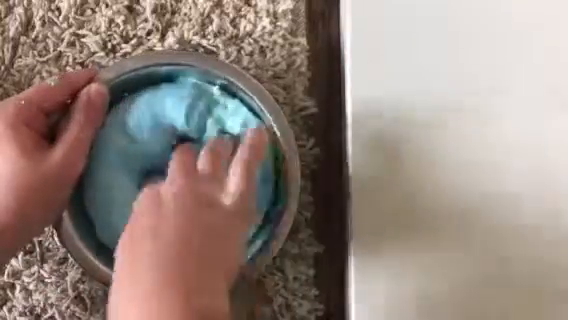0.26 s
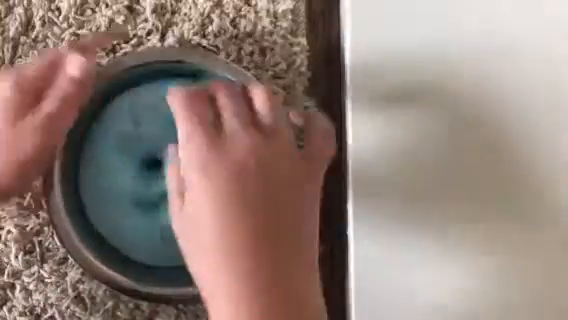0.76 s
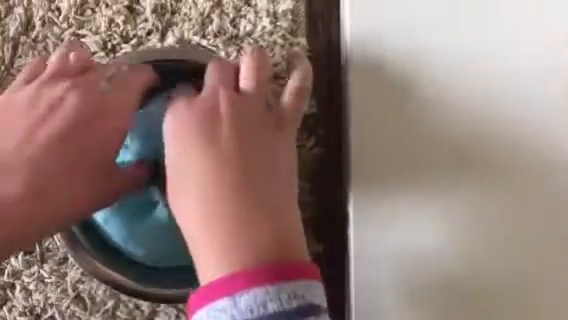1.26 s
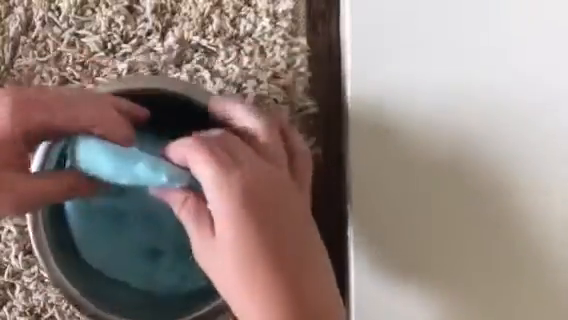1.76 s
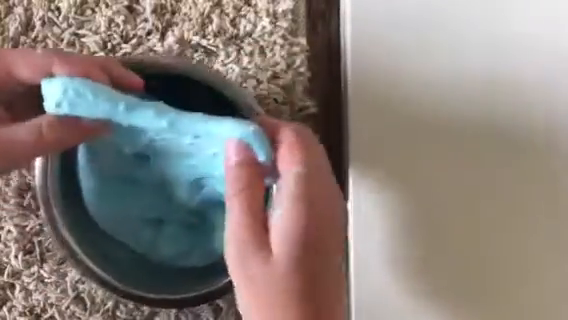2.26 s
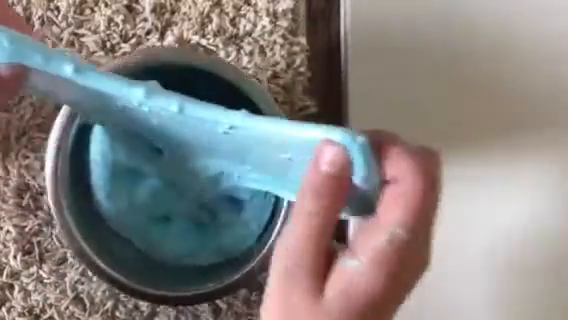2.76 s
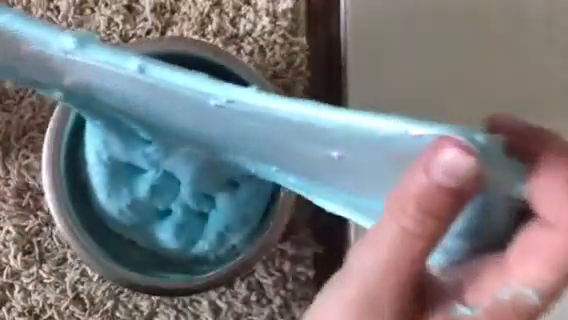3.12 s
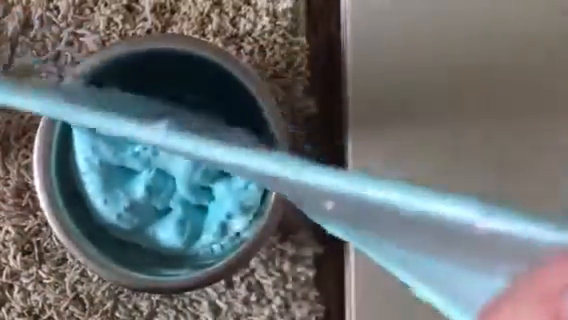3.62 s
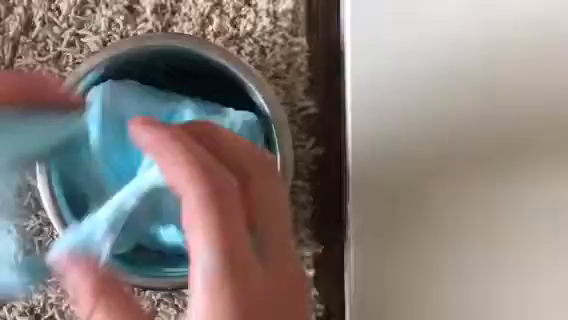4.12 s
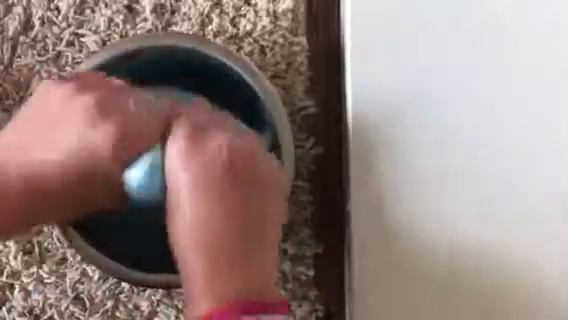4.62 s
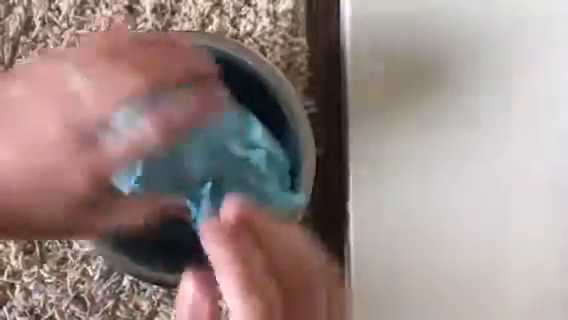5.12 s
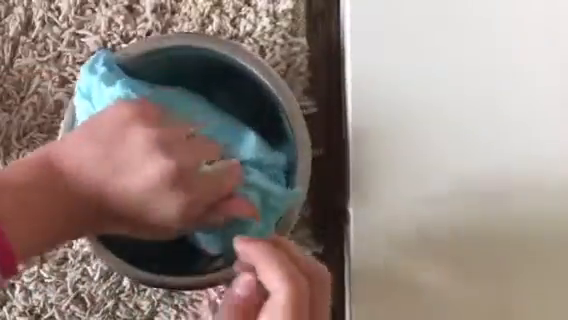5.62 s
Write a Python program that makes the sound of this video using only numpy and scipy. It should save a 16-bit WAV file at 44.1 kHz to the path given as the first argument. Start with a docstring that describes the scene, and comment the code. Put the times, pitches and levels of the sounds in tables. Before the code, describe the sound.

Close up in a quiet room, slime in a metal bowl gives a loud snap, then a cluster of bright pops and soft wet ticks. Stretching is quieter with low rubbing, a loud dull bowl knock follows, then pressing brings hollow rubbing, squelches, a short squeak and dense crackling pops.

```python
"""Air pockets burst in sticky slime that hands poke, lift, stretch and press in a metal bowl in a quiet room.
Each burst is a ringing noise snap and smack plus a low sine plop; a decaying-noise echo follows.
The bowl, dragged on carpet, hums as resonant modes; low thuds of bowl and slime are short sine jolts.
Kneading strokes swell the rubbing, a squelch of ringing cavities and a crackle of random grains;
an early bed of faint hiss stops abruptly. Gliding noise bands squeak over floor rumble and room noise."""
import sys
import numpy as np
from scipy import signal
from scipy.fft import rfft, irfft, next_fast_len
from scipy.io import wavfile
from scipy.ndimage import uniform_filter1d

SR = 44100
rng = np.random.default_rng(int(sys.argv[2]) if len(sys.argv) > 2 else 0)


def waveform_to_disk(signal):
    """Save audio, clipped to [-1, 1], as 16-bit WAV at the path in sys.argv[1]."""
    frames = np.transpose(np.atleast_2d(signal))
    scaled = np.clip(frames, -1, 1) * 32767
    samples = np.round(scaled).astype(np.int16)
    wavfile.write(sys.argv[1], SR, samples)


N = 259297
PRESSED_IN_S = 4.2  # from here all the slime is back in the bowl


def amp(db):
    """Decibels to gain."""
    return 10 ** (np.asarray(db) / 20)


def rms_one(x):
    """Scale to unit rms."""
    return x / np.sqrt(np.mean(x ** 2) + 1e-20)


def steady(x, over_s):
    """Divide by the running rms, which evens the level to 1."""
    return x / np.sqrt(uniform_filter1d(x ** 2, round(over_s * SR)) + 1e-20)


def in_time(rows):
    """Interpolate rows of (seconds, values..) to one curve per column, sample by sample."""
    s, *columns = np.transpose(rows)
    return [np.interp(np.arange(N) / SR, s, column) for column in columns]


def colour(x, spectrum):
    """Shape by (Hz, dB) points, closed steeply outside them; unit rms."""
    hz, db = np.transpose(spectrum)
    size = next_fast_len(N)
    log_grid = np.log(np.arange(size // 2 + 1) * SR / size + 1)
    log_points = np.log(np.r_[hz[0] / 2, hz, hz[-1] * 1.25])
    gain = amp(np.interp(log_grid, log_points, np.r_[-90, db, -90]))
    return rms_one(irfft(rfft(x, size) * gain, size)[:N])


def drift(corner_hz):
    """Slow random wander of unit rms: noise through two equal low-pass poles."""
    r = np.exp(-2 * np.pi * corner_hz / SR)
    noise = rng.standard_normal(N + SR)
    return rms_one(signal.lfilter([1], [1, -2 * r, r * r], noise)[SR:])  # first second settles


def ring(x, hz, t60_s):
    """Two-pole resonator: a unit click starts a decaying sine of about unit height."""
    r, w = amp(-60 / (t60_s * SR)), 2 * np.pi * hz / SR
    return signal.lfilter([0, np.sin(w)], [1, -2 * r * np.cos(w), r * r], x + 1e-18)


def add(out, start_s, piece):
    """Mix a short piece in at its start time."""
    i = round(start_s * SR)
    out[i:i + len(piece)] += piece[:N - i]


def grains(per_s, spread_db, smooth):
    """Tiny random ruptures of uneven size over a share of smooth noise."""
    sizes = amp(spread_db * np.minimum(rng.exponential(1, N), 5)) * rng.choice([-1, 1], N)
    clicks = rms_one(sizes * (rng.random(N) < per_s / SR))
    return clicks + smooth * rng.standard_normal(N)


def room_noise():
    """Faint steady noise of the room."""
    # Each row: frequency in Hz, relative density in dB per Hz.
    room_spectrum = [(88, -26), (150, -7), (235, -6.5), (291, 6.5), (361, -7), (637, -2), (716, -6.5),
                     (1060, -3), (2140, -8.5), (4860, -17), (9440, -21), (14500, -22), (16000, -26.5)]
    return amp(-73) * colour(rng.standard_normal(N), room_spectrum)


def floor_rumble():
    """Low noise of the floor shaken by the hands."""
    # Each row: time in seconds, level in dB.
    rumble_levels = [(0.0, -62), (0.6, -68.5), (2.88, -73.5), (3.11, -67.5), (3.44, -56.5), (5.12, -64),
                     (5.88, -62)]
    # Each row: frequency in Hz, relative density in dB per Hz.
    rumble_spectrum = [(13, -63), (22, -30), (65, 0), (103, -2), (134, -5.5), (200, -9), (260, -38),
                       (440, -120)]
    level_db = in_time(rumble_levels)[0]
    return amp(level_db) * colour(rng.standard_normal(N), rumble_spectrum)


def kneading():
    """Levels in dB of strokes, and of an early bed of faint hiss that stops abruptly near 0.42 s; powers add."""
    # Strokes and the hiss bed (second row), each row: start in seconds, length in seconds,
    # level change over that length in dB, release in dB/s, then levels in dB:
    # rubbing of low modes, rubbing of upper modes, squelch, crackle.
    swells = [(-0.02, 0.054, -1.5, 249, -45.5, -44, -46, -46),
              (0.075, 0.341, -0.5, 899.5, -70.5, -76, -70.5, -66.5),
              (0.462, .06, 12.5, 302, -100, -94, -79.5, -76),
              (0.521, .08, 9, 249.5, -51.5, -57, -59.5, -59), (0.803, 0.075, -1, 195, -72, -66, -70, -70.5),
              (0.94, 0.17, 0.5, 150, -87, -80, -74.5, -73), (1.209, 0.12, -5, 122, -67, -66, -61.5, -60),
              (1.4, 0.15, 8.5, 122, -81, -85, -72, -69), (1.595, .13, -5, 206, -69.5, -92, -59, -58.5),
              (1.756, 0.19, -1.5, 51.5, -90, -81, -68.5, -70),
              (2.889, 0.17, 5.5, 41.5, -56, -63.5, -73, -82), (3.11, .4, 5, 100, -54, -55.5, -70.5, -79),
              (3.537, .18, 0.5, 451, -57, -51.5, -71, -77), (3.84, 0.63, -2, 150, -70.5, -83.5, -77, -78),
              (4.425, 0.086, 0, 103, -53.5, -75, -70, -76),
              (4.535, 0.16, 12, 302.5, -66, -68, -66.5, -76.5),
              (4.689, 0.028, 0.5, 249, -53, -37, -50, -46),
              (4.744, .09, -1.5, 249, -46.5, -51.5, -51.5, -56),
              (4.916, 0.1, -4.5, 299.5, -35, -32.5, -41.5, -55.5),
              (5.02, .04, -2, 200.5, -42, -44.5, -49, -60.5), (5.087, .05, -4, 448, -36.5, -48.5, -58, -72),
              (5.2, 0.48, -6.5, 200, -67.5, -85, -75, -75.5), (5.487, .13, 4, 300.5, -70, -51.5, -61, -64),
              (5.621, 0.15, -6.5, 152, -85, -55.5, -66, -53.5), (5.8, .08, 4.5, 300, -69, -68, -60, -58.5)]
    # Slime creeping between strokes: levels in dB of the same four layers.
    resting_db = (-102.5, -86, -83, -79)
    attack_s = 0.018  # time of a 30 dB rise
    t = np.arange(0, N + 64, 64) / SR
    power = amp(resting_db)[:, None] ** 2 * np.ones(len(t))
    for start_s, length_s, swell_db, release_db_per_s, *levels_db in swells:
        shape_db = swell_db * np.clip((t - start_s) / length_s, 0, 1)
        shape_db -= release_db_per_s * np.maximum(t - start_s - length_s, 0)
        shape_db -= 30 * np.maximum(1 - (t - start_s) / attack_s, 0)
        power = power + amp(np.array(levels_db)[:, None] + shape_db) ** 2
    return in_time(np.c_[t, 10 * np.log10(power).T])


def fine_crackle(level_db):
    """Random tiny ruptures over smooth noise, with a slightly wavering level."""
    # Each row: frequency in Hz, relative density in dB per Hz.
    crackle_spectrum = [(1760, -29), (3000, 1), (4760, -4), (6220, -0.5), (7510, -5.5), (8170, -2.5),
                        (10300, -4.5), (11200, -5), (15000, -9.5), (16000, -15.5)]
    ruptures = grains(1700, 1.1, smooth=0.52)
    return amp(level_db + 0.45 * drift(40)) * colour(ruptures, crackle_spectrum)


def squeaks(wander_hz):
    """Air squeezed through a narrowing gap: a narrow noise band glides in pitch, swells and fades."""
    # Each row: start in seconds, end in seconds, first pitch in Hz, last pitch in Hz, level in dB.
    glides = [(1.429, 1.604, 1196, 1560, -60), (1.601, 1.818, 1310, 1148, -63),
              (1.807, 2.083, 1963, 2150, -72.5), (3.874, 3.97, 1800, 2710, -70),
              (4.553, 4.703, 1600, 2106, -64.5), (4.923, 4.999, 1740, 2163, -45),
              (5.818, 5.89, 1200, 1443, -49.5), (5.83, 5.879, 2700, 3270, -60.5)]
    out = np.zeros(N)
    unsteady = drift(wander_hz) + 1j * drift(wander_hz)
    for start_s, end_s, first_hz, last_hz, db in glides:
        i, size = round(start_s * SR), round((end_s - start_s) * SR)
        pitch_hz = np.linspace(first_hz, last_hz, size)
        tone = np.exp(2j * np.pi * np.cumsum(pitch_hz) / SR)
        wander = unsteady[i:i + size]
        kept = len(wander)
        add(out, start_s, amp(db) * (np.hanning(size)[:kept] * tone[:kept] * wander).real)
    return out


def squelch(level_db):
    """Small wet cavities close at random, each ringing at its own pitch; low levels mostly hiss."""
    # Each row: frequency in Hz, relative density in dB per Hz.
    squelch_spectrum = [(410, -27.5), (700, -2), (844, 2.5), (941, -6.5), (1060, 2), (1900, 0), (2000, 2),
                        (4500, -20), (5850, -45.5), (9900, -120)]
    wetness = np.clip((level_db + 70) / 18, .25, 1)
    closing = wetness * grains(1200, 3.5, smooth=0) + .6 * rng.standard_normal(N)
    cavities_hz = np.geomspace(750, 4400, 24)
    dealt = rng.integers(0, len(cavities_hz), N)  # cavity that each sample excites
    rings = np.zeros(N)
    for k, hz in enumerate(cavities_hz):
        rings += rms_one(ring(closing * (dealt == k), hz, 34 / hz)) / np.sqrt(hz)
    wet = colour(np.diff(rings, prepend=0), squelch_spectrum)
    return amp(level_db + 1.2 * drift(34)) * steady(wet, over_s=0.071)


def bowl(force):
    """Resonant modes of the bowl: one set with the slime pulled up, another with its mass on the walls."""
    # Both tables, each row: mode frequency in Hz, gain in dB, t60 in seconds.
    lifted_modes = [(141, -17.5, 0.33), (288.6, 3, 0.11), (446, -0.5, 0.025), (690.3, -2, 0.069),
                    (845, -8.5, 0.026), (1040, -27.5, .06), (1600, -34.5, 0.024)]
    pressed_modes = [(143.3, -22, 0.043), (263.9, 2, 0.1), (556.7, 4.5, 0.044), (803, -13.5, 0.053),
                     (1034, -23, 0.068), (1570, -23.5, 0.059), (1880, -23, 0.092), (2270, -26, 0.08)]
    t = np.arange(N) / SR
    pressed = t >= PRESSED_IN_S
    force = force * amp(np.where(t < 2.8, -22, 0))  # until then hands on the rim deaden the modes
    out = np.zeros(N)
    for modes, active in ((lifted_modes, ~pressed), (pressed_modes, pressed)):
        for hz, db, t60_s in modes:
            out += amp(db) * ring(force * active, hz, t60_s)
    return out


def rubbing(low_db, upper_db):
    """Carpet fibres and sticky slime pluck the bowl in fine jerks; running levels of low and upper parts are evened."""
    # Dull carpet rustle, each row: frequency in Hz, relative density in dB per Hz.
    carpet_spectrum = [(90, -10.5), (200, -3), (500, -0.5), (1100, -2), (1400, -20.5)]
    fibres = grains(1500, 2.5, smooth=1.2) * amp(1.5 * drift(25))
    hum = bowl(fibres)
    hum = hum / hum[-SR:].std()
    rustle_db = np.where(np.arange(N) < PRESSED_IN_S * SR, -3, -16.5)  # weaker under the full weight
    drag = hum + amp(rustle_db) * colour(fibres, carpet_spectrum)
    split_hz = 420
    low = signal.sosfilt(signal.butter(4, split_hz, "low", fs=SR, output="sos"), drag)
    upper = signal.sosfilt(signal.butter(4, split_hz, "high", fs=SR, output="sos"), drag)
    return amp(low_db) * steady(low, over_s=0.11) + amp(upper_db) * steady(upper, over_s=0.067)


def jolt(db, hz, cycles):
    """A rounded wobble, a few sine cycles under a squared-sine swell."""
    cycles = max(cycles, .5)
    phase = np.arange(0, cycles, hz / SR)  # in cycles
    return amp(db) * np.sin(2 * np.pi * phase) * np.sin(np.pi * phase / cycles) ** 2


def low_thuds():
    """Low thuds of the bowl knocked and the slime pushed, with a higher slap in the knock at 3.69 s."""
    # Each row: time in seconds, level in dB, pitch in Hz, length in cycles.
    thuds = [(0.981, -56, 300, 0.85), (1.415, -44.5, 256, 2.1), (3.6926, -5, 477, 1.52),
             (3.692, -37, 1610, 7.2), (3.75, -43.5, 501, 0.58), (4.301, -48, 259, 1.4),
             (4.433, -32.5, 244, 3.47), (4.457, -40, 231, 1.93), (4.935, -35, 256, 2.7),
             (5.546, -34.5, 300, 1.07)]
    out = np.zeros(N)
    for s, db, hz, cycles in thuds:
        add(out, s, jolt(db, hz, cycles))
    return out


def burst(hz, peak_db, cycles, noise, last_s, mouth_cycles):
    """A short uneven tear rings in its pocket and again in its soft mouth; more cycles narrow the colour."""
    t = np.arange(len(noise)) / (last_s * SR)
    tear = noise * t * np.exp(-t)
    sound = ring(ring(tear, hz, cycles / hz), hz, mouth_cycles / hz)
    sound = np.diff(sound, prepend=0)  # a small source radiates no bass
    return amp(peak_db) * sound / np.abs(sound).max()


def pops():
    """Each burst is a bright snap with a dying fizz, a wetter smack and a low plop of the mass just after."""
    # Each row: time in seconds, snap peak in dB, snap pitch in Hz, smack peak in dB, smack pitch in Hz,
    # plop level in dB.
    pockets = [(0.0151, -4, 8470, -23, 1500, -24), (0.3905, -47.5, 3880, -46, 1270, -49),
               (0.5251, -43, 11300, -29, 970, -36), (0.5313, -69, 3610, -30, 1030, -53),
               (0.5463, -46, 8300, -25, 980, -50), (0.557, -13.5, 5600, -27.5, 1210, -26.5),
               (0.5874, -20.5, 6600, -23, 1130, -24.5), (0.6132, -35, 4000, -50, 1270, -37.5),
               (0.838, -52, 9370, -64, 1740, -47.5), (0.8695, -43.5, 10000, -67, 1065, -48),
               (1.1027, -36, 11200, -51, 1240, -42), (1.2262, -28, 3650, -34, 1600, -39),
               (1.3007, -51, 3370, -55, 1880, -51.5), (1.6127, -35, 10100, -69, 1240, -78),
               (1.6692, -40.5, 3300, -39, 1270, -53), (1.711, -48, 3400, -37, 1270, -51),
               (2.5087, -51, 5340, -58.5, 2150, -72), (2.5469, -50, 9700, -54, 1600, -75),
               (2.85, -49.5, 6900, -66, 1800, -63.5), (3.8743, -58, 8900, -48.5, 1710, -59),
               (3.9667, -54, 6300, -66, 1047, -71), (4.2577, -66, 4100, -43, 1810, -64),
               (4.6911, -21.5, 7100, -33, 1730, -57), (4.6947, -22, 7300, -23, 1530, -29),
               (4.7512, -33.5, 8700, -38, 1170, -37), (4.933, -46, 3710, -37.5, 1570, -47),
               (5.0489, -49, 8020, -38.5, 1560, -60), (5.4498, -67, 3670, -44, 2260, -50),
               (5.4781, -34, 3750, -32.5, 1420, -32.5), (5.4915, -44, 3500, -60, 990, -32.5),
               (5.505, -40, 3680, -38, 2100, -55), (5.5343, -39, 5500, -33.5, 1750, -31.5),
               (5.5689, -39, 6560, -34, 2110, -36.5), (5.5896, -44, 6170, -51, 2000, -40),
               (5.6095, -37, 8750, -40, 2270, -34.5), (5.6223, -26, 9300, -38, 2270, -36),
               (5.6632, -29, 5940, -33.5, 1960, -38), (5.7058, -46, 6390, -36, 1500, -59),
               (5.7335, -28.5, 6460, -46, 2220, -61), (5.7453, -38, 7500, -55, 2850, -66),
               (5.762, -36, 6360, -39, 1930, -41), (5.8293, -41, 7240, -62, 1300, -53)]
    air, plops = np.zeros(N), np.zeros(N)
    for s, snap_db, snap_hz, smack_db, smack_hz, plop_db in pockets:
        snap_noise, smack_noise, fizz_noise = rng.standard_normal((3, 2048))
        add(air, s, burst(snap_hz, snap_db, 4, snap_noise, last_s=.0002, mouth_cycles=.6))
        add(air, s, burst(snap_hz, snap_db - 20.5, 2, fizz_noise, last_s=.002, mouth_cycles=.85))
        add(air, s, burst(smack_hz, smack_db, 9, smack_noise, last_s=.0005, mouth_cycles=1.5))
        centre_hz = 300 if s < PRESSED_IN_S else 556  # higher once the mass is pressed tight
        plop_hz = centre_hz * np.exp(.06 * rng.standard_normal())
        add(plops, s + .0015, jolt(plop_db, plop_hz, cycles=2.16))
    return air, plops


def tail(x):
    """Echo from slime, bowl and room: noise that dies band by band, faded in over 2.2 ms."""
    # Each row: band frequency in Hz, level in dB, t60 in seconds.
    echo_bands = [(300, -35, 0.17), (1500, -27.5, 0.051), (4000, -24, 0.04), (8240, -21, 0.033),
                  (15800, -39.5, 0.044)]
    t = np.arange(SR // 2) / SR
    echo = np.zeros(len(t))
    for hz, db, t60_s in echo_bands:
        edges_hz = [hz / 1.62, min(hz * 1.374, 19000)]
        band = signal.butter(1, edges_hz, "band", fs=SR, output="sos")
        noise = signal.sosfilt(band, rng.standard_normal(len(t)))
        echo += amp(db - 60 * t / t60_s) * noise
    return signal.fftconvolve(x, echo * np.minimum(t / 0.0022, 1))[:N]


def scene():
    """Room, kneading, bowl and pops at one microphone."""
    low_db, upper_db, squelch_db, crackle_db = kneading()
    background = room_noise() + floor_rumble()
    wet = squelch(squelch_db) + squeaks(wander_hz=240)
    air, plops = pops()
    jolts = plops + low_thuds()
    struck = amp(-42) * bowl(jolts)  # jolts also set the bowl ringing
    direct = air + jolts
    slime = wet + fine_crackle(crackle_db)
    return (direct + tail(direct) + struck + rubbing(low_db, upper_db) + slime + background)[None]


def record(dry):
    """The small microphone loses the deep bass; the top is cut."""
    thin = signal.sosfilt(signal.butter(2, 45.3, "high", fs=SR, output="sos"), dry)
    return signal.sosfilt(signal.cheby2(12, 60, 16500, fs=SR, output="sos"), thin)  # 60 dB down at 16.5 kHz


dry = scene()
out = record(dry)
waveform_to_disk(out)
```